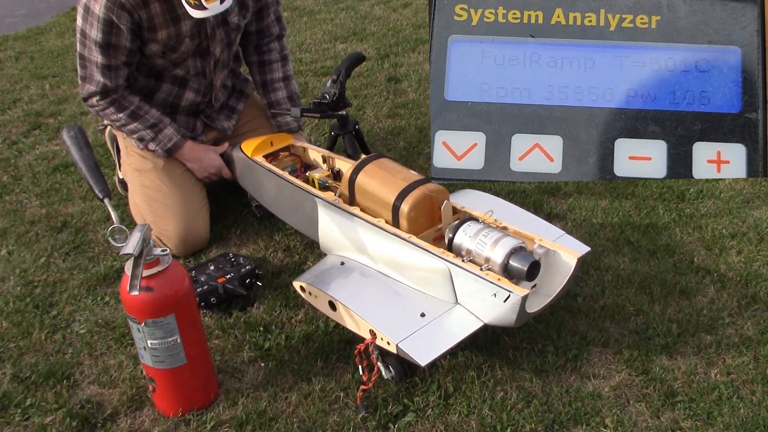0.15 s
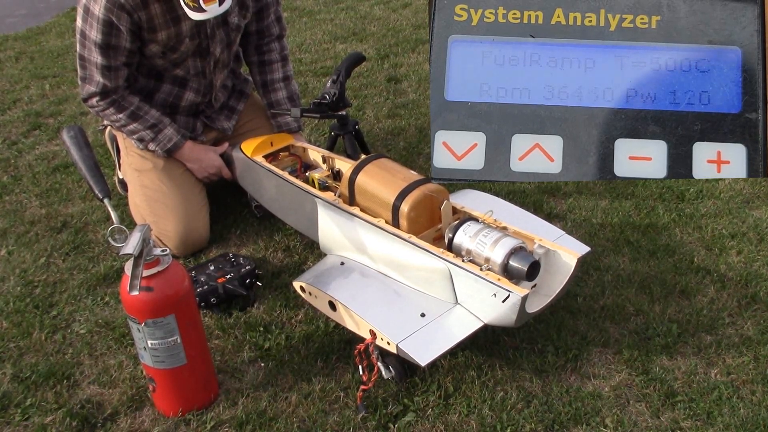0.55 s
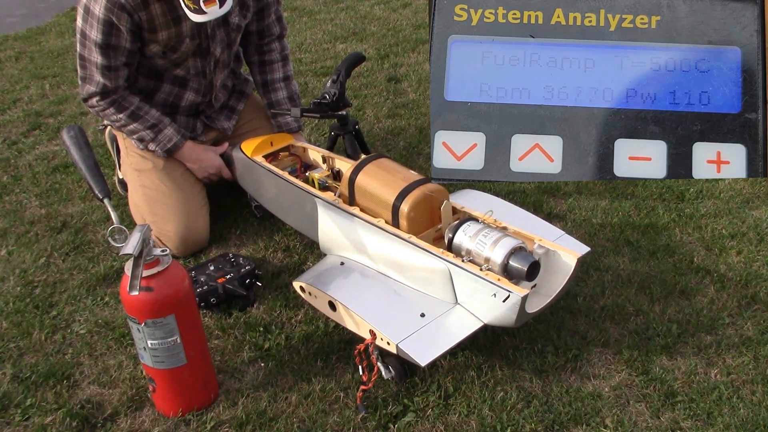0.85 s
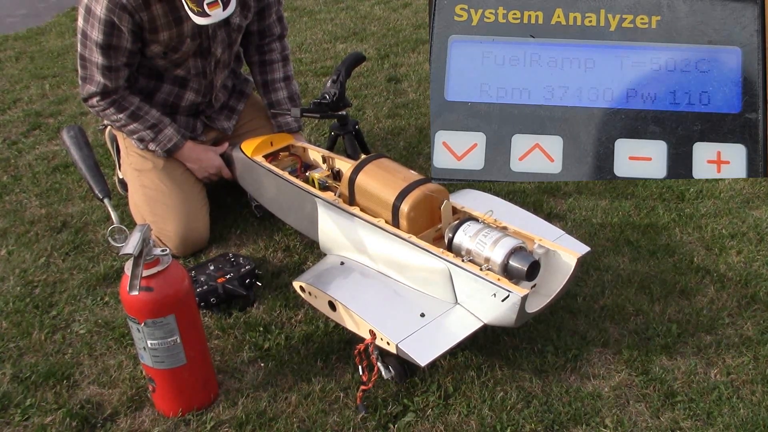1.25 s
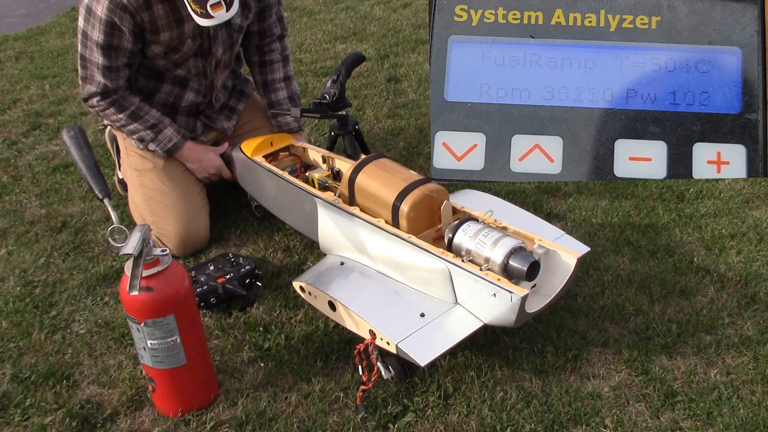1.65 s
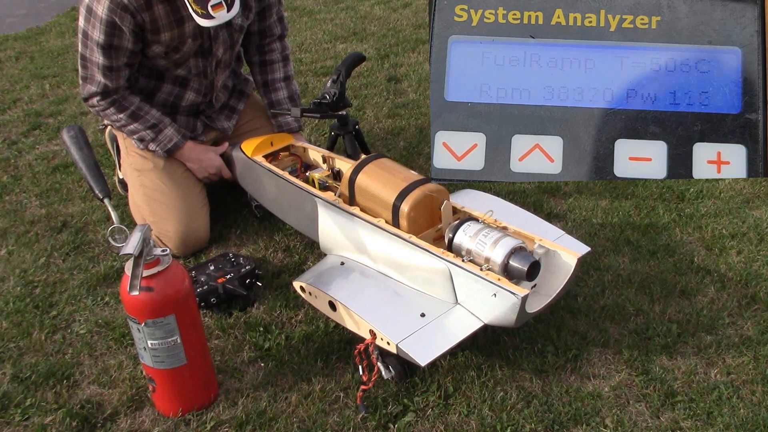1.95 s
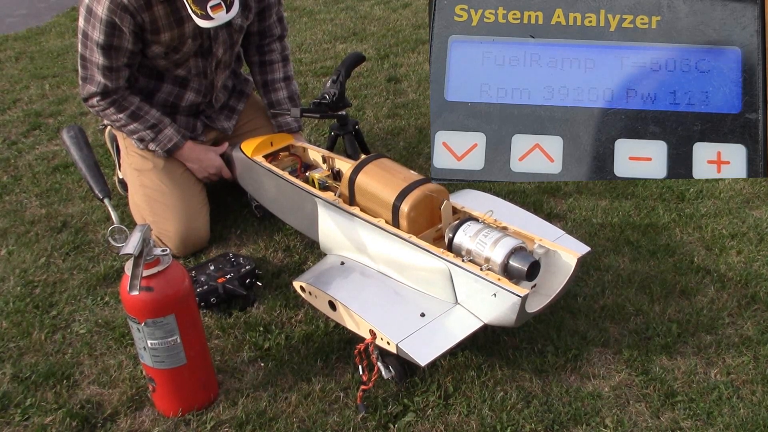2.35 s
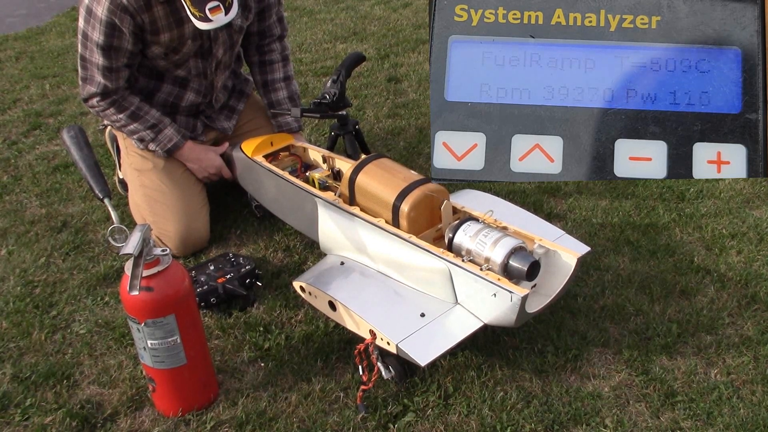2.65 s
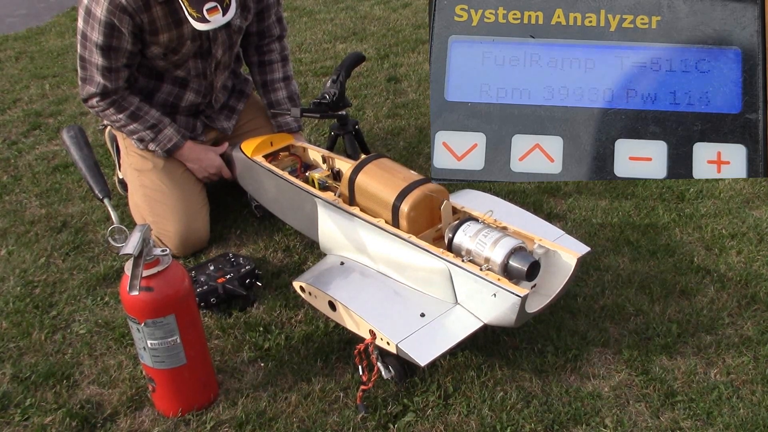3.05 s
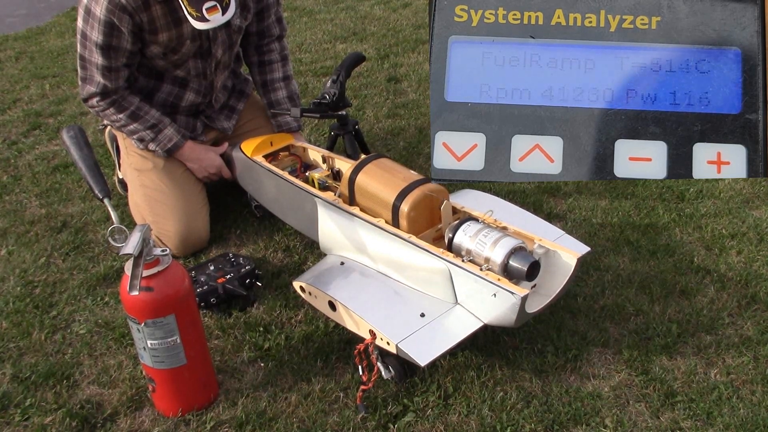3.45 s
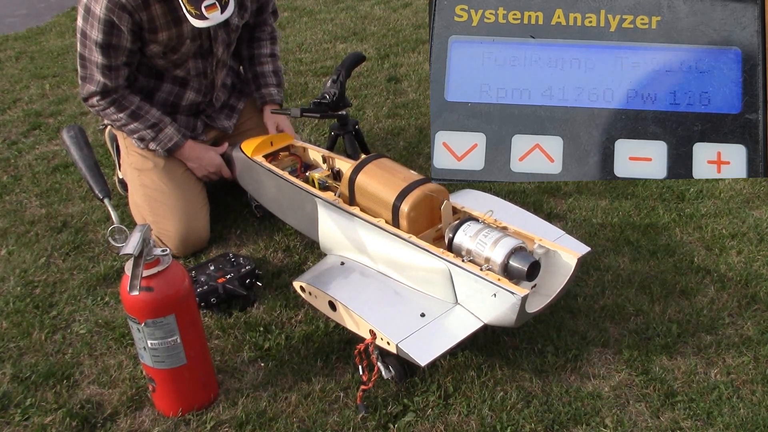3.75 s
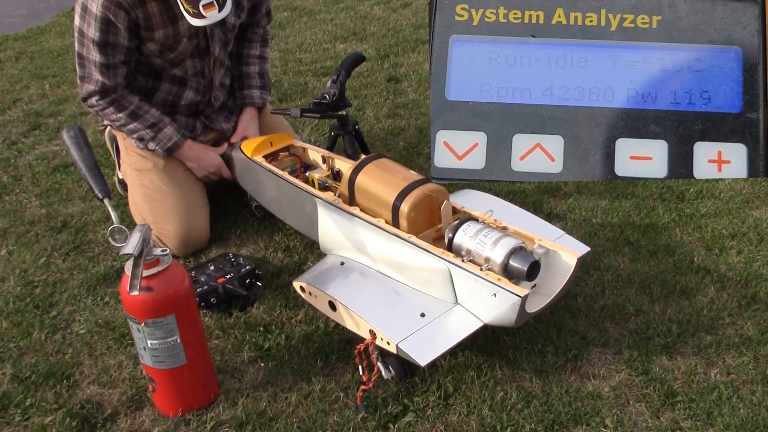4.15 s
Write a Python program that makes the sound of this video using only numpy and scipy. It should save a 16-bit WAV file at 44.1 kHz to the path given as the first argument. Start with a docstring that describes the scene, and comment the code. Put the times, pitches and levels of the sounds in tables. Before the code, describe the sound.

Outdoors, close and dry with no echo, a small turbine engine keeps up a rough mid-to-high jet rush. Irregular flares and a short falter mark the first second and a half; an unsteady hooting tone leaps briefly upward around two seconds. Very high blade whine rises gradually, swelling and fading, then holds. Soft wind rumble and faint low motor hum lie underneath.

```python
"""An uneven, flaring rush of exhaust: a small model jet turbine spools up toward idle on a lawn.
It stands a few steps from the microphone. The jet is shaped noise in three bands that flare and falter.
The combustor adds a rumbling flame and a wavering howl, both fading or drifting on their own curves.
The blades whine at multiples of the shaft speed, swelling and cancelling in the casing.
Underneath, a breeze pushes on the microphone and a far motor hums on steady low notes."""
import sys
import numpy as np
from scipy import signal
from scipy.fft import rfft, irfft
from scipy.io import wavfile

SR = 44100
rng = np.random.default_rng(int(sys.argv[2]) if len(sys.argv) > 2 else 0)


def master(y):
    """Save y as 16-bit WAV."""
    cut = np.clip(np.atleast_2d(y).T, -1, 1)
    pcm = np.round(cut * 32767)  # scale
    wavfile.write(sys.argv[1], SR, pcm.astype(np.int16))


N = 190423
TIME = np.arange(N) / SR  # s

# steady strength of the jet: (time [s], exhaust roar [dB], nozzle hiss [dB], fine fizz [dB])
JET_LEVELS = [(0, -40.5, -47, -59.5), (.6, -41.5, -45.5, -53), (1.5, -42, -45.5, -54.5),
              (1.85, -40.5, -43, -51.5), (2.5, -42.5, -46.2, -54), (3.28, -42, -46, -54.5),
              (3.6, -42, -45, -54.5), (4.12, -41.5, -44, -50), (4.32, -41.5, -44, -51.5)]
# flares of the exhaust: (time of peak [s], length [s], strength [dB], brightness [0-1])
EXHAUST_FLARES = [(0.035, 0.018, 5, .1), (0.083, 0.062, 5, 0.9), (0.215, 0.021, 4.5, 1),
                  (0.336, 0.092, 1.5, 1), (0.448, 0.1, 8, 0.62), (0.718, 0.082, 7.5, 0.58),
                  (.83, 0.092, 4.5, 0.6), (1.196, 0.081, 8, 0.66), (1.31, .075, 8, 0.62),
                  (2.235, 0.047, 3, 0.85), (2.308, 0.066, 3.5, 0.53), (2.67, 0.12, 5, .8),
                  (3.019, 0.051, 3.5, .15), (3.485, .06, 6.5, 0.65)]
# lulls, where the jet falters: (time of bottom [s], length [s], depth [dB])
JET_LULLS = [(0.155, .05, -0.5), (.26, 0.018, -1.5), (0.969, 0.068, -6), (1.09, 0.11, -2.5),
             (2.565, .045, -1)]
# relative spectra of the jet's three bands: (frequency [Hz], density [dB per Hz])
ROAR_SPECTRUM = [(60, -11), (300, -13), (520, -13.5), (700, -4.5), (1130, -2), (1340, -10), (1650, -1),
                 (1900, -4), (2200, -7.5), (2500, -2), (3080, 1), (3500, -5.5), (3850, -2), (4700, -20)]
HISS_SPECTRUM = [(3500, -42), (4800, -16), (5400, -4), (6000, 1), (6400, -1), (6800, -1.5), (7250, -3.5),
                 (7900, -1), (9300, -3.5), (10500, -13), (13000, -24)]
FIZZ_SPECTRUM = [(7000, -30), (9500, -0.5), (10500, -0.5), (11400, 0), (12200, -6), (12900, -13),
                 (14200, -6.5), (15700, -14)]
# relative spectrum of the left-right difference in the fizz: (frequency [Hz], density [dB per Hz])
FIZZ_SIDE_SPECTRUM = [(3500, -40), (6000, -35.5), (8000, -14), (9300, 1), (11000, 1), (13500, 3),
                      (15000, 3)]

# combustor howl before it wobbles and leaps: (time [s], pitch [Hz])
HOWL_PITCH_CURVE = [(0, 755), (.3, 762), (1.25, 792.5), (1.45, 803), (2.67, 801), (3.13, 893), (3.55, 905),
                    (4.32, 862)]
# combustor howl before it shakes: (time [s], level [dB])
HOWL_LEVELS = [(0, -48.5), (.85, -48.7), (1.28, -44.5), (1.42, -49), (1.9, -47), (2.65, -48), (3.1, -54.5),
               (3.5, -54), (4.32, -49)]
# the howl leaps up and slips back: (time of top [s], length [s])
HOWL_LEAP_TIMES = [(1.832, .13), (2.06, 0.076), (2.289, .085), (2.448, 0.0703), (2.847, .08)]
LEAP_HZ = 43.04  # height of each leap
# rumble of the flame, which dies as the burn settles: (time [s], level [dB])
FLAME_LEVELS = [(0, -45), (.48, -45.8), (.6, -52), (1, -57), (4.32, -68)]
# relative spectrum of that rumble: (frequency [Hz], density [dB per Hz])
FLAME_SPECTRUM = [(60, -48), (170, -8), (380, 5), (600, -0.5), (1050, 7.5), (1500, -4.5), (2000, 0.5),
                  (3000, -34)]

# the shaft climbs, pauses, and climbs again to idle: (time [s], speed [turns per s])
SHAFT_SPEED = [(0.0, 595.5), (0.55, 608.4), (1.6, 636.6), (2.1, 651.0), (2.5, 655.8), (2.74, 656.0),
               (3.05, 671.9), (3.6, 697.0), (3.8, 703.7), (4.0, 706.3), (4.32, 706.0)]
# the 7 compressor blades, twice that with the splitters, three times, and the turbine wheel:
# (multiple of the shaft speed)
BLADE_ORDERS = [7, 14, 21, 23]
# one row for each multiple, before the casing colours it: (level at lowest speed [dB], level at idle [dB],
# settled flicker [dB rms], share of flares, share of a deep lull, lean: added left, taken off right [dB])
BLADE_TONE_SETTINGS = [(-72, -68, 3.5, .5, .5, -0.5), (-56, -44, 1.04, .15, 3.6, 0.15),
                       (-65, -80, 1.7, 0.45, .1, -1.2), (-76.5, -67, 2, 1.1, .6, -1.2)]
# standing waves of the casing, which swell or cancel a tone: (frequency [Hz], width [Hz], gain [dB])
CASING_WAVES = [(8497, 42, 9), (8660, 140, 11), (8825, 170, 10), (9230, 210, 9.3), (9435, 90, 7.5),
                (9535, 105, 11.5), (9725, 70, 4), (9874, 12, -7), (12690, 170, 7), (13050, 230, 9),
                (13570, 200, 15), (13840, 140, 14), (14220, 420, 8), (14780, 480, 12)]
SHALLOW_DB = 2  # a lull shallower than this leaves the blade tones alone

# relative spectrum of the breeze at the microphone: (frequency [Hz], density [dB per Hz])
BREEZE_SPECTRUM = [(.5, -20), (2, -4), (4, 1), (10, -4), (20, -30.5), (30, -26), (45, -31), (100, -55),
                   (400, -64)]
# lines of the far motor, lowest first, before they waver: (frequency [Hz], level [dB])
HUM_LINES = [(86.8, -61.5), (120, -66.5), (140, -74), (174, -72), (202.5, -68.5), (285, -75)]
# the far motor's lowest note against its usual strength: (time [s], level [dB])
LOWEST_HUM_LEVEL = [(0, -7), (.45, -7), (.7, 1.5), (4.32, 2.5)]

EDGE_HZ = 15800  # upper band limit of the recorder


def exhaust(flutter_db=.5, sputter_db=1.3, roar_lull=0.73, hiss_flare=0.81, fizz_lull=0.5, spread_db=-14):
    """Turbulent gas: the bands share flares and flutter; the finest eddies sputter most and are a little wide."""
    roar_db, hiss_db, fizz_db = curves(JET_LEVELS)
    dull_db, sharp_db = flares()
    lull_db = lull()
    sputter = sputter_db * drift(rate_hz=110)

    roar_db = roar_db + dull_db + roar_lull * lull_db
    roar = gain_of(roar_db) * noise(ROAR_SPECTRUM)

    hiss_db = hiss_db + hiss_flare * sharp_db + lull_db + sputter / 2
    hiss = gain_of(hiss_db) * noise(HISS_SPECTRUM)

    # the side noise has opposite signs left and right
    middle = noise(FIZZ_SPECTRUM)
    side = gain_of(spread_db) * noise(FIZZ_SIDE_SPECTRUM)
    fizz_db = fizz_db + sharp_db + fizz_lull * lull_db + sputter
    fizz = gain_of(fizz_db) * (middle + np.array([side, -side]))

    flutter = gain_of(flutter_db * drift(rate_hz=35))
    return (roar + hiss + fizz) * flutter


def flares():
    """Decibels that the flares add to the dull and to the bright part of the jet."""
    dull_db, sharp_db = 0, 0
    for peak_s, length_s, strength_db, bright in EXHAUST_FLARES:
        flare_db = strength_db * bell(TIME, peak_s, length_s)
        dull_db = dull_db + (1 - bright) * flare_db
        sharp_db = sharp_db + bright * flare_db
    return dull_db, sharp_db


def lull():
    """Level change while the jet falters, in negative decibels."""
    return sum(depth_db * bell(TIME, bottom_s, length_s) for bottom_s, length_s, depth_db in JET_LULLS)


def combustor(wobble_hz=7, shake_db=1.3):
    """The flame rumbles at first, and keeps the burner can singing on an unsteady note."""
    leaps = sum(bell(TIME, top_s, length_s) for top_s, length_s in HOWL_LEAP_TIMES)
    pitch_hz = curves(HOWL_PITCH_CURVE)[0] + LEAP_HZ * leaps + wobble_hz * drift(rate_hz=63.3)
    howl_db = curves(HOWL_LEVELS)[0] + shake_db * drift(rate_hz=80)
    howl = tone(pitch_hz, howl_db)
    rumble = gain_of(curves(FLAME_LEVELS)[0]) * noise(FLAME_SPECTRUM)
    return howl + rumble


def blades(jitter=0.00046, settle_s=1.0):
    """Blade-passing tones climb with the shaft, swelling or cancelling at the casing's standing waves."""
    shaft = curves(SHAFT_SPEED)[0]
    spool = (shaft - shaft.min()) / np.ptp(shaft)  # 0 at the lowest speed, 1 at idle
    unsteady_shaft = shaft * (1 + jitter * drift(rate_hz=44))
    # the tones flutter more until the flow has settled
    unsettled = 1 + 2.3 * np.exp(-TIME / settle_s)
    flare_db = flares()[1]
    deep_lull_db = np.minimum(lull() + SHALLOW_DB, 0)

    whines = 0
    for order, settings in zip(BLADE_ORDERS, BLADE_TONE_SETTINGS):
        slow_db, idle_db, flicker_db, flare_share, lull_share, lean_db = settings
        spool_db = slow_db + (idle_db - slow_db) * spool
        casing_db = sum(db * bell(order * shaft, hz, width_hz) for hz, width_hz, db in CASING_WAVES)
        flow_db = flare_share * flare_db + lull_share * deep_lull_db
        flow_db = flow_db + flicker_db * unsettled * drift(rate_hz=20)
        whine = tone(order * unsteady_shaft, spool_db + casing_db + flow_db)
        whines = whines + whine * gain_of([[lean_db], [-lean_db]])  # left, right
    return whines


def surroundings():
    """The breeze and the far motor, beneath the engine."""
    return breeze() + far_motor()


def breeze(level_db=-43, gust_db=3):
    """Moving air pushes on the microphone in lumps: low noise with a slowly drifting level."""
    return gain_of(level_db + gust_db * drift(rate_hz=3.1)) * noise(BREEZE_SPECTRUM)


def far_motor(waver=0.008105, swell_db=1.25):
    """A distant motor hums on lines that waver in pitch and level, its lowest note swelling in."""
    lines = []
    for hz, db in HUM_LINES:
        pitch_hz = hz * (1 + waver * drift(rate_hz=3.8))
        lines.append(tone(pitch_hz, db + swell_db * drift(rate_hz=5.9)))
    lowest, *upper = lines
    return gain_of(curves(LOWEST_HUM_LEVEL)[0]) * lowest + sum(upper)


def gain_of(db):
    """Decibels to amplitude."""
    return 10 ** (np.asarray(db) / 20)


def evened(x):
    """Scales to an rms of 1."""
    return x / np.sqrt(np.mean(x ** 2) + 1e-20)


def curves(rows):
    """Each column of a table after the time, joined by straight lines."""
    time_s, *columns = np.transpose(rows)
    return [np.interp(TIME, time_s, column) for column in columns]


def bell(x, centre, width):
    """A bump of height 1, with the given width at half height."""
    return .5 ** ((2 * (x - centre) / width) ** 2)


def drift(rate_hz):
    """Smooth random change of rms 1, falling away in rate above the given one."""
    hz = np.fft.rfftfreq(N, 1 / SR)
    spectrum = rfft(rng.standard_normal(N)) / (1 + (hz / rate_hz) ** 4)
    return evened(irfft(spectrum, N))


def noise(colour):
    """Noise of rms 1 with the given spectrum, falling away above its last point."""
    hz = np.fft.rfftfreq(N, 1 / SR) + 1e-3  # keeps the logarithm finite
    points_hz, points_db = np.transpose(colour)
    shape = gain_of(np.interp(np.log(hz), np.log(points_hz), points_db))
    shape = shape * np.minimum(points_hz[-1] / hz, 1) ** 4
    return evened(irfft(rfft(rng.standard_normal(N)) * shape, N))


def tone(hz, db):
    """A sine of the given rms level that follows a pitch curve from a random phase."""
    turns = np.cumsum(hz) / SR + rng.random()
    return np.sqrt(2) * gain_of(db) * np.sin(2 * np.pi * turns)


def scene():
    """All is heard from one spot, a few steps from the engine."""
    return exhaust() + combustor() + blades() + surroundings()


def record(dry):
    """The recorder's band limit: a steep low-pass filter."""
    low_pass = signal.firwin(511, EDGE_HZ, window=("kaiser", 9), fs=SR)
    return signal.oaconvolve(dry, low_pass[None], "same")


dry = scene()
out = record(dry)
master(out)
```